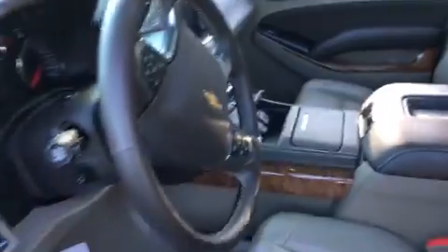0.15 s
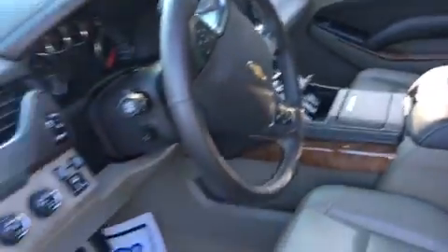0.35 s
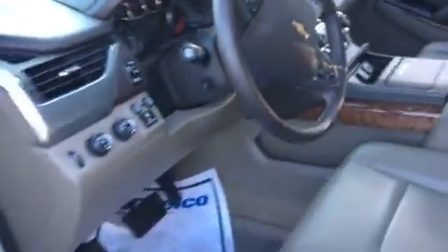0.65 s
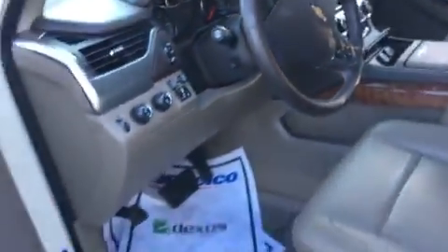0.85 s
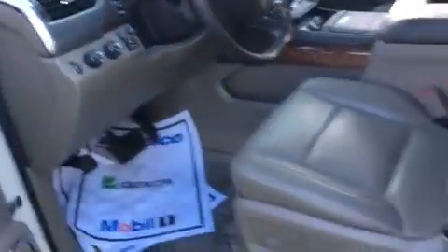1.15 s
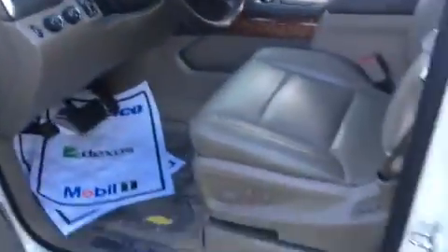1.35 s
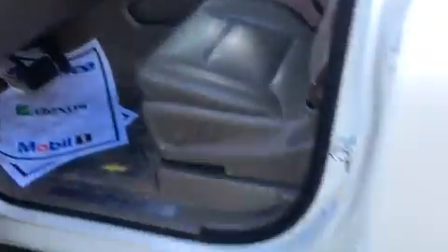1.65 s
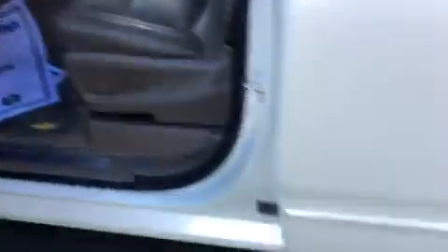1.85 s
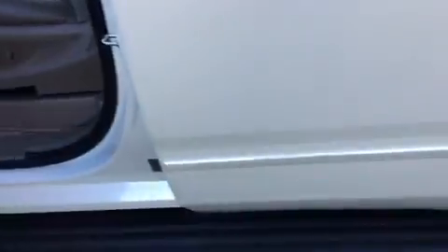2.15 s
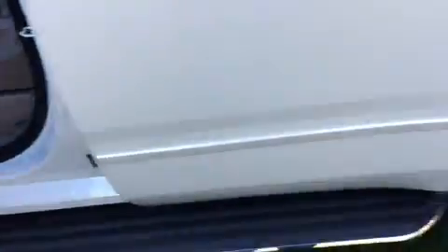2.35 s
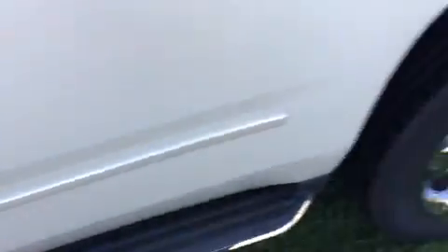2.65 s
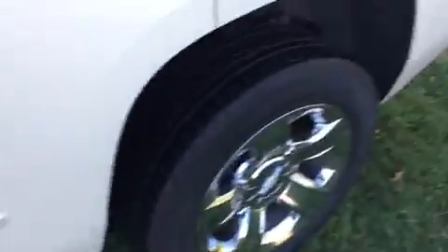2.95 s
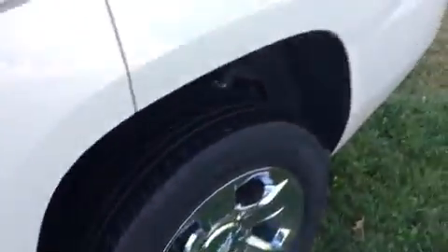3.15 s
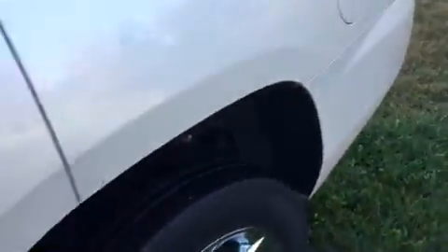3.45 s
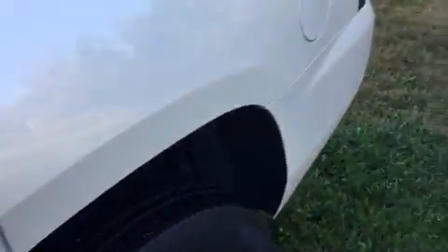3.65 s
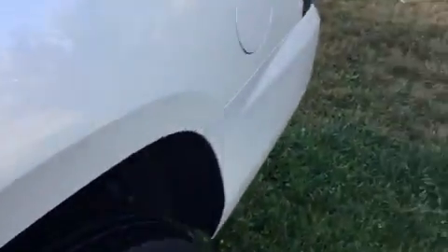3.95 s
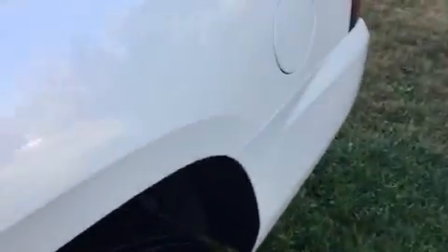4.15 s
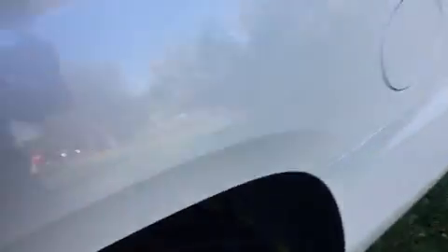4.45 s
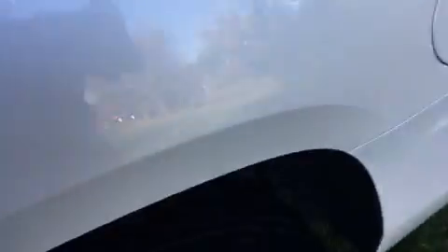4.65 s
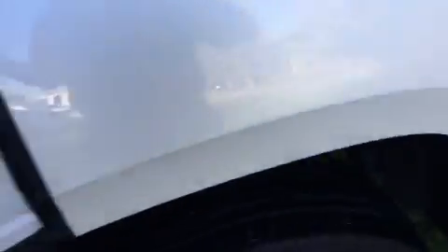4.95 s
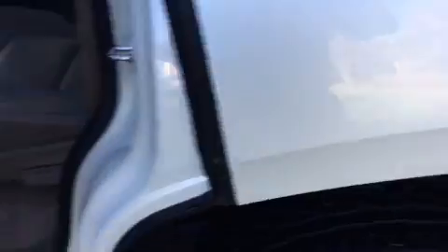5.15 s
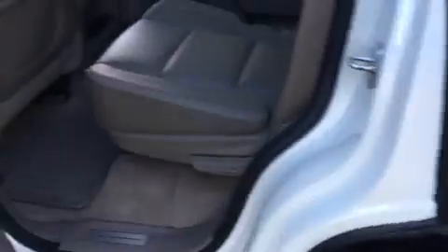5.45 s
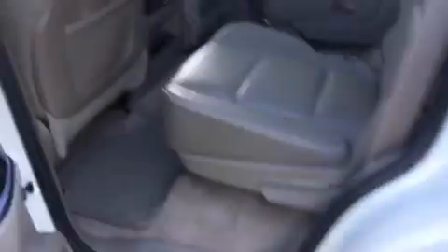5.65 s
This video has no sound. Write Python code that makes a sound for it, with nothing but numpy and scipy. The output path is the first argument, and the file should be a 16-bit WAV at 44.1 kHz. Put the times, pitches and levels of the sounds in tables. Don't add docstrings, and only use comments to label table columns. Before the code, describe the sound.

A quiet lot with distant traffic and early dove coos; a big car door slams hard, then another door's latch knocks open.

```python
import sys
import numpy as np
from scipy import signal
from scipy.fft import rfft, irfft, next_fast_len
from scipy.io import wavfile

SR = 44100
rng = np.random.default_rng(int(sys.argv[2]) if len(sys.argv) > 2 else 0)


def master(y):
    cut = np.clip(np.atleast_2d(y).T, -1, 1)
    pcm = np.round(cut * 32767)
    wavfile.write(sys.argv[1], SR, pcm.astype(np.int16))


def voltage_ratio(level):
    return 10 ** (np.asarray(level, float) / 20)


N = 256220
TIME = np.arange(N) / SR

# frequency_hz, density_db [dB per Hz]
RUMBLE_SPECTRUM = [(13, -36), (22, -42), (43, 0), (64, 1), (103, -5), (166, -8.5), (258, -16), (289, -14),
                   (324, -18.5), (450, -19), (580, -52), (990, -120)]
# frequency_hz, density_db [dB per Hz]
TYRE_SPECTRUM = [(180, -50), (300, -0.5), (453, -9.5), (497, -2.5), (546, -1), (588, -1.5), (1010, -1),
                 (1160, -2), (1440, -3.5), (2800, -18), (3640, -46), (6160, -120)]
# frequency_hz, density_db [dB per Hz]
LEAF_SPECTRUM = [(1180, -10.5), (2000, -2.5), (2930, -11.5), (3210, -10.5), (4460, -14.5), (5650, -16),
                 (6080, -18.5), (6710, -24.5), (7000, -25), (9100, -54), (15400, -120)]
# frequency_hz, density_db [dB per Hz]
RUSTLE_SPECTRUM = [(2000, -42), (3200, -5), (5000, -5.5), (6500, -5), (7600, -8.5), (9600, -8),
                   (10400, -12), (11000, -21), (13000, -62)]
# frequency_hz, density_db [dB per Hz]
RATTLE_SPECTRUM = [(150, -22), (250, 0.5), (492, -25), (604, -19.5), (1030, -23.5), (1370, -27.5),
                   (1600, -22), (4470, -31.5), (8940, -42), (10800, -50), (14000, -80), (22000, -120)]
# time_s, level_db
TRAFFIC_LEVEL = [(0, -55), (.7, -53.5), (1.6, -52.5), (2.0, -53), (3.0, -51.5), (3.5, -52), (3.75, -48.5),
                 (4.25, -46), (4.5, -47), (5.81, -48)]
# time_s, level_db
BREEZE_LEVEL = [(0, -65.5), (.5, -69), (.9, -63.5), (1.95, -61.5), (3.05, -61.5), (3.25, -57), (3.5, -60.5),
                (3.95, -57.5), (4.15, -50.5), (4.4, -50), (4.53, -56), (4.8, -57.5), (5.3, -56.5),
                (5.81, -59)]
# start_s, length_s, swell_db [over the still rustle]
STEPS = [(-.5, 2.84, 4), (2.997, 3.2, 2), (0.027, 0.11, 7.5), (.3, .15, 7), (0.697, 0.24, 9.5),
         (.86, 0.34, 8.5), (1.358, 0.41, 9), (1.7, .25, 6), (1.92, .2, 9.5), (2.997, .3, 8),
         (3.086, 0.367, 14), (3.42, 0.3, 7), (3.6, 0.22, 10), (3.864, .11, 12.5), (4.024, 0.32, 11),
         (4.305, 0.2, 9), (4.48, 0.33, 5.5), (4.685, 0.25, 10.5), (4.852, .17, 11.5)]
# start_s, length_s, pitch_hz, level_db
COOS = [
    (0.082, 0.24, 374.5, -55.5),
    (.19, 0.097, 621.4, -55),
    (.31, 0.36, 619, -51),
    (0.881, .26, 620, -57.5),
    (1.329, 0.28, 621, -54.5),
    (2.9, 0.47, 626, -59.5),
]
# start_s, length_s, first_hz, last_hz, level_db
WHISTLES = [
    (.075, .22, 3580, 3430, -68),
    (.28, 0.038, 3640, 3620, -67),
    (0.331, .17, 3450, 3450, -71.5),
]
# start_s, level_db, pitch_hz
FOOTFALLS = [(0.948, -30.5, 57.6), (1.578, -32.5, 125), (2.896, -30, 325), (2.919, -28.5, 59.5),
             (4.786, -28, 93), (4.866, -25, 73.3), (4.925, -22.5, 65.5), (5.48, -34, 60), (5.56, -33, 134),
             (5.64, -31, 165), (0.451, -37, 150), (.7, -39, 141), (1.3, -30, 65)]
# start_s, level_db, contact_cutoff_hz
SLAM_BLOWS = [
    (3.287, -28.5, 900),
    (3.293, -21, 900),
    (3.302, -11, 2500),
    (3.309, -11.5, 900),
    (3.333, -17.5, 1500),
    (3.355, -24.5, 1500),
    (3.39, -22.5, 900),
    (3.43, -39, 500),
]
# frequency_hz, level_db, t60_s
DOOR_MODES = [(194.5, -5, 0.35), (216, -10.5, 0.23), (285.3, -6.5, 0.35), (341, -3.5, 0.21),
              (384.5, -7.5, 0.29), (421, -6.5, 0.26), (446, -11, 0.061), (502, -13.5, 0.13),
              (540, -17.5, .2), (594, -8, 0.23), (650, -19, 0.17), (749, -25, 0.17), (850, -29, 0.28),
              (967, -13, 0.099), (1020, -20, 0.06), (1106, -14.5, 0.13), (1300, -24, 0.14),
              (1520, -25, 0.1), (1700, -12, 0.13), (1854, -10.5, 0.17), (1990, -21, 0.2),
              (2220, -10.5, 0.27), (2400, -10, 0.21), (2654, -8, 0.19), (2790, -18, 0.115)]
# start_s, level_db, pitch_hz, ring_cycles
SLAM_THUMPS = [(3.285, -29, 390, 16), (3.2948, -7.5, 233, 11), (3.3033, 1, 169, 17.7),
               (3.316, -6, 58.7, 20), (3.3032, -5, 290, 5), (3.322, -14.5, 197, 16), (3.31, -14, 43, 11),
               (3.334, -12, 101, 25), (3.39, -15.5, 178, 12), (3.388, -16.5, 300, 17),
               (3.415, -17.5, 102.4, 16.6), (3.657, -27, 62.5, 17)]
# start_s, level_db, pitch_hz
PULL_THUMPS = [(4.092, -30, 180), (4.099, -31, 320), (4.131, -28, 300), (4.172, -28, 290), (4.21, -24, 280),
               (4.1873, -22.5, 384), (4.199, -19, 360), (4.223, -23.5, 94), (4.236, -32, 160),
               (4.277, -28, 125), (4.435, -27.5, 102), (4.688, -31, 250), (4.697, -33, 420),
               (4.244, -31, 81), (4.619, -32, 112), (4.655, -33.5, 160), (4.713, -29.5, 147),
               (3.5, -31, 96), (4.71, -36, 300), (3.7, -30, 218)]
# start_s, level_db, pitch_hz
CLUNKS = [
    (4.191, -10, 146),
    (4.2033, -15.5, 142),
    (4.2714, -23, 400),
    (4.277, -25, 232),
]
# start_s, peak_db, pitch_hz, t60_s
RINGS = [(3.3027, -15.5, 965, 0.037), (3.3027, -12, 730, 0.026), (3.326, -24.5, 1060, 0.082),
         (4.112, -37, 850, .05), (4.133, -32, 1380, .04), (4.137, -32.5, 3100, 0.056),
         (4.188, -32.5, 910, .037), (4.203, -27, 540, 0.065), (4.2705, -28.5, 587, 0.032),
         (4.288, -39, 1300, 0.066), (4.671, -45, 3500, .035), (4.685, -29.5, 1620, 0.018),
         (4.688, -33.5, 664, 0.086)]
# start_s, peak_db, centre_hz, t60_s
SNAPS = [(.989, -46, 2400, .03), (2.246, -49, 5000, .02), (2.257, -40.5, 6750, 0.046),
         (2.268, -42, 1000, 0.037), (3.302, -6.5, 6500, 0.014), (3.692, -46, 3000, .03),
         (3.81, -46, 4000, .09), (4.104, -43, 2000, 0.034), (4.134, -40, 4000, 0.032),
         (4.198, -32, 2585, 0.035), (4.207, -33, 5970, 0.049), (4.22, -35, 2150, .08),
         (4.272, -36, 1000, .022), (4.36, -48, 2580, 0.17), (4.6608, -34.5, 2580, 0.036),
         (4.661, -48, 7500, .011), (4.684, -25, 2530, 0.036), (4.684, -45, 7000, 0.01),
         (5.426, -52, 7060, .024)]
# start_s, peak_db
REBOUNDS = [
    (3.313, -25),
    (3.328, -23),
    (3.343, -23),
    (3.355, -31),
    (3.368, -35),
    (3.384, -38),
]
# start_s, peak_db, pitch_hz, t60_s
PINGS = [
    (.675, -53, 3480, .02),
    (4.1045, -28.5, 1870, .012),
    (4.2066, -24.5, 2200, .022),
    (4.6845, -24.5, 3500, 0.017),
    (4.687, -28.5, 5370, 0.038),
    (4.703, -46, 3480, .05),
]

IMPACT_S, SEAL_S = 3.303, 3.283


def rms_one(x):
    return x / np.sqrt(np.mean(x ** 2) + 1e-20)


def in_time(rows):
    time_s, level_db = np.transpose(rows)
    return np.interp(TIME, time_s, level_db)


def drift(rate_hz):
    step = 40
    r = np.exp(-2 * np.pi * rate_hz * step / SR)
    white = rng.standard_normal(N // step + 2002)
    slow = signal.lfilter([1], [1, -2 * r, r * r], white)[2000:]
    return np.interp(np.arange(N) / step, np.arange(len(slow)), rms_one(slow))


def banded_noise(spectrum, patchy_db, rate_hz):
    hz_points, db_points = np.transpose(spectrum)
    octaves = np.log2(hz_points[-1] / hz_points[0])
    edges = hz_points[0] * 2 ** np.arange(0, octaves + 0.3, 1 / 3)
    edges = edges[(edges > 15) & (edges < 1.3 * hz_points[-2])]
    out = np.zeros(N)
    together = drift(rate_hz)
    white = rng.standard_normal((2, N))
    for k, (low, high) in enumerate(zip(edges, edges[1:])):
        bandpass = signal.butter(2, [low, high], "band", fs=SR, output="sos")
        flicker_db = patchy_db * (0.5 * together + drift(rate_hz))
        out += signal.sosfilt(bandpass, white[k % 2]) * voltage_ratio(flicker_db)
    size = next_fast_len(N)
    hz = np.arange(1, size // 2 + 2) * SR / size
    colour = voltage_ratio(np.interp(np.log(hz), np.log(hz_points), db_points))
    return rms_one(irfft(rfft(out, size) * colour, size)[:N])


def resonate_twice(x, hz, width_hz):
    r, w = np.exp(-np.pi * width_hz / SR), 2 * np.pi * hz / SR
    section = [1, 0, -1, 1, -2 * r * np.cos(w), r * r]
    return signal.sosfilt([section, section], x)


def step_swell_db():
    attack_s, release_s = 0.06, 0.053
    swell_db = np.zeros(N)
    for start, length, db in STEPS:
        t = TIME - start
        ramp = np.minimum(t / attack_s, (length - t) / release_s)
        swell_db = np.maximum(swell_db, db * np.clip(ramp, 0, 1))
    return swell_db


def traffic(swell_db):
    tyre_db = in_time(TRAFFIC_LEVEL)
    rumble_db = -47 + 0.17 * swell_db + 0.085 * (tyre_db - tyre_db.mean())
    sway_db, sway_t60_s = -34, 0.97
    sway = (TIME > IMPACT_S) * voltage_ratio(sway_db - 60 * np.abs(TIME - IMPACT_S) / sway_t60_s)
    rumble = (voltage_ratio(rumble_db + 2.7) + sway) * banded_noise(RUMBLE_SPECTRUM, patchy_db=1.46, rate_hz=5.8)
    return rumble + voltage_ratio(tyre_db - 0.23) * banded_noise(TYRE_SPECTRUM, patchy_db=1.17, rate_hz=11.4)


def leaves():
    return voltage_ratio(in_time(BREEZE_LEVEL) + 0.74) * banded_noise(LEAF_SPECTRUM, patchy_db=0.8, rate_hz=14.0)


def chorus(hz, width_hz):
    return rms_one(resonate_twice(rng.standard_normal(N), hz, width_hz))


def insects():
    out = voltage_ratio(-72 - 1.5 * TIME) * chorus(5350, width_hz=460)
    out += voltage_ratio(-81 + 1.1 * TIME) * chorus(5760, width_hz=300)
    first_chirp_s, chirp_gap_s, chirp_s = 0.046, 0.0764, 0.014
    count, into_s = np.divmod(TIME - first_chirp_s, chirp_gap_s)
    strength_db = rng.normal(0, 3.5, 100)[count.astype(int)]
    pulse = np.sin(np.pi * np.clip(into_s / chirp_s, 0, 1)) ** 2
    return out + voltage_ratio(-69.5 + strength_db) * pulse * np.sin(2 * np.pi * 6500 * TIME)


def dove():
    sag_hz_per_s = 13.5
    out, waver_db = np.zeros(N), 0.8 * drift(8.0)
    for start, length, hz, db in COOS:
        t = np.clip(TIME - start, 0, length)
        swell = np.abs(np.sin(np.pi * t / length)) ** 0.4 * (t < length)
        cycles = (hz - sag_hz_per_s * t / 2) * t
        out += voltage_ratio(db + waver_db) * swell * np.sin(2 * np.pi * cycles)
    return out


def songbird():
    fade_db_per_s, edge_s = 15, 0.015
    out = np.zeros(N)
    for start, length, hz, last_hz, db in WHISTLES:
        t = np.clip(TIME - start, 0, length)
        gate = np.clip(np.minimum(t, length - t) / edge_s, 0, 1)
        cycles = (hz + (last_hz - hz) * t / length / 2) * t
        out += gate * voltage_ratio(db - fade_db_per_s * t) * np.sin(2 * np.pi * cycles)
    return out


def rustle(swell_db):
    return voltage_ratio(-75.5 + swell_db + 4.5) * banded_noise(RUSTLE_SPECTRUM, patchy_db=1.6, rate_hz=14.0)


def pushes(rows, rise_cycles, sag):
    out, t = np.zeros(N), np.arange(SR // 2) / SR
    for s, db, first_hz, cycles in rows:
        t60 = cycles / first_hz
        hz = first_hz * (1 - sag + sag * np.exp(-t / (0.15 * t60)))
        shape = (1 - np.exp(-t * first_hz / rise_cycles)) * voltage_ratio(db - 60 * t / t60)
        wave = shape * np.sin(2 * np.pi * np.cumsum(hz) / SR)
        at = round(s * SR)
        out[at:at + len(t)] -= wave[:N - at]
    return out


def thumps():
    footfalls = [(*row, 13.0) for row in FOOTFALLS]
    pulls = [(*row, 13.0) for row in PULL_THUMPS]
    clunks = [(*row, 9.0) for row in CLUNKS]
    return (pushes(footfalls, rise_cycles=0.78, sag=0.059)
            + pushes(pulls, rise_cycles=0.18, sag=0.17)
            + pushes(clunks, rise_cycles=0.074, sag=0.15)
            + pushes(SLAM_THUMPS, rise_cycles=0.51, sag=0.176))


def chatter(rows, width):
    out, t = np.zeros(N), np.arange(SR // 8) / SR
    for s, db, hz, t60 in rows:
        grains = rng.standard_normal(len(t)) * rng.exponential(1, len(t)) ** 0.82
        grains *= (1 - np.exp(-t / (0.019 * t60))) * voltage_ratio(-60 * t / t60)
        rung = resonate_twice(grains + 1e-18, hz, 1.5 * width * hz)
        at = round(s * SR)
        out[at:at + len(t)] += voltage_ratio(db) * rung / np.abs(rung).max()
    return out


def clicks():
    rebounds = [(s, db, 2500, 0.027) for s, db in REBOUNDS]   # pitch_hz, t60_s
    return (chatter(SNAPS, width=0.81) + chatter(rebounds, width=0.72)
            + chatter(RINGS, width=0.35) + chatter(PINGS, width=0.16))


def shiver(impact_db, crack_db, rise_db_per_s, fall_db_per_s):
    crack_s, settle_s, settle_db_per_s = 0.0061, 0.091, 150
    t = TIME - IMPACT_S
    after = np.maximum(t, 0)
    level_db = impact_db + crack_db * np.exp(-after / crack_s) - fall_db_per_s * after
    level_db += rise_db_per_s * np.minimum(t, 0) - settle_db_per_s * np.maximum(t - settle_s, 0)
    return voltage_ratio(level_db) * np.clip((TIME - SEAL_S) / 0.0022, 0, 1)


def rattle():
    noise = banded_noise(RATTLE_SPECTRUM, patchy_db=2.5, rate_hz=87.0)
    trim = signal.sosfilt(signal.butter(2, 3500, fs=SR, output="sos"), noise)
    glass = noise - trim
    return (shiver(-16.5, crack_db=7, rise_db_per_s=1500, fall_db_per_s=158) * rms_one(trim)
            + shiver(-23, crack_db=6.5, rise_db_per_s=2998, fall_db_per_s=295) * rms_one(glass))


def door_panel():
    out, t = np.zeros(N), np.arange(SR) / SR
    spread_db = rng.normal(0, 3.6, (len(SLAM_BLOWS), len(DOOR_MODES)))
    signs = rng.choice([-1, 1], (len(SLAM_BLOWS), len(DOOR_MODES)))
    hz, mode_db, t60 = np.transpose(DOOR_MODES)[:, :, None]
    rings = voltage_ratio(mode_db - 60 * t / (0.46 * t60)) * np.sin(2 * np.pi * hz * t)
    for (s, db, cutoff_hz), own_db, sign in zip(SLAM_BLOWS, spread_db, signs):
        softness = 1 / (1 + (hz[:, 0] / cutoff_hz) ** 2)
        at = round(s * SR)
        out[at:at + SR] += (voltage_ratio(db + own_db) * sign * softness) @ rings
    return out


def scene():
    swell_db = step_swell_db()
    background = traffic(swell_db) + leaves() + insects() + dove() + songbird() + rustle(swell_db)
    doors = thumps() + clicks() + rattle() + door_panel()
    return (background + doors)[None]


def roll_off(x):
    return signal.sosfilt(signal.butter(12, 11110, fs=SR, output="sos"), x)


def record(dry):
    x = signal.sosfilt(signal.butter(2, 31, "high", fs=SR, output="sos"), dry)
    x = x / (1 + np.abs(x / 1.02) ** 6) ** (1 / 6)
    x = signal.sosfilt(signal.cheby2(12, 60, 13500, fs=SR, output="sos"), x)
    return roll_off(x)


dry = scene()
out = record(dry)
master(out)
```